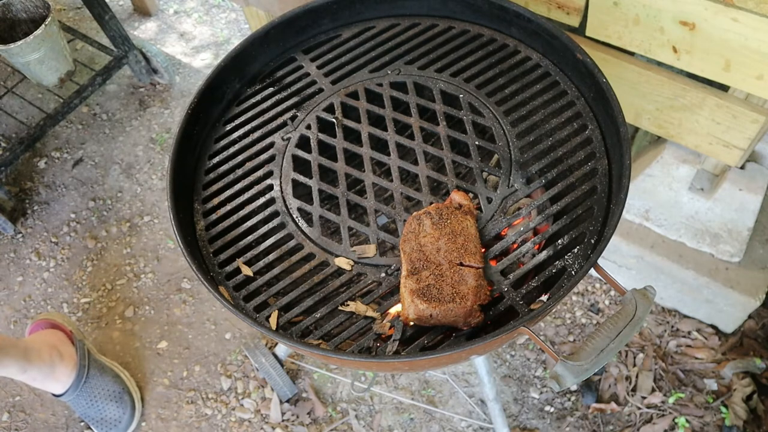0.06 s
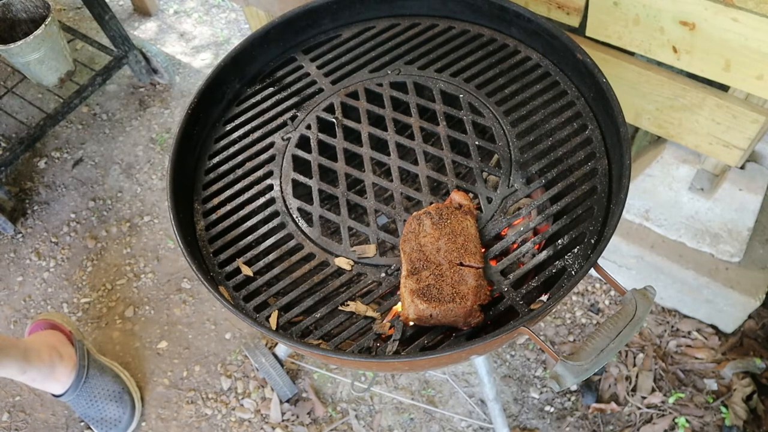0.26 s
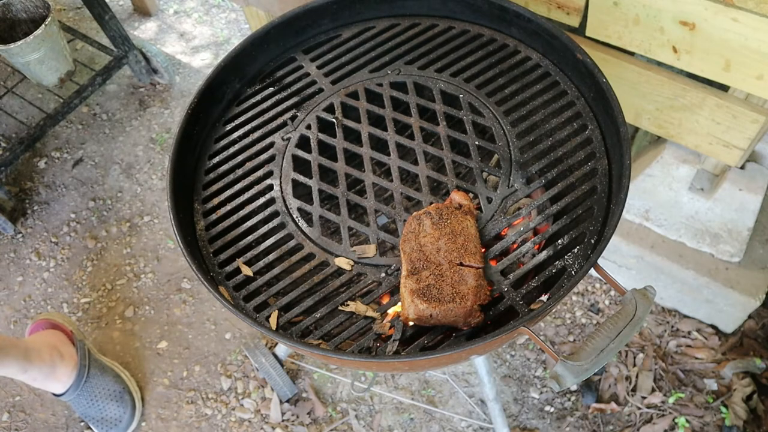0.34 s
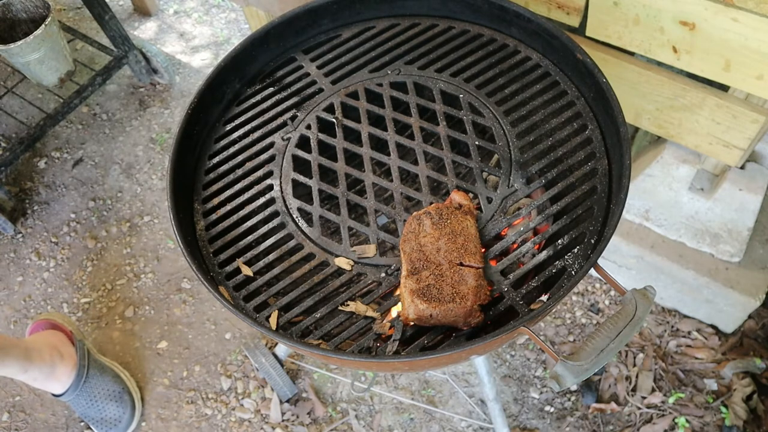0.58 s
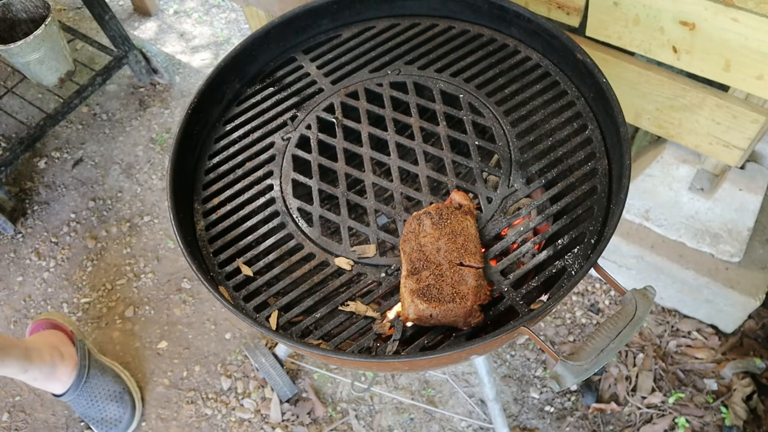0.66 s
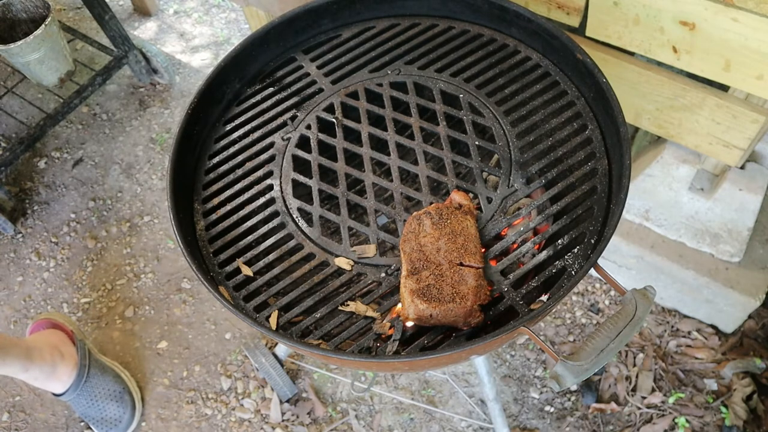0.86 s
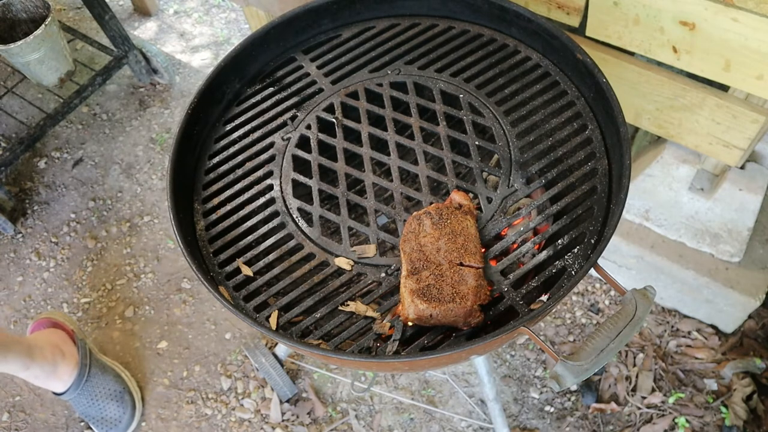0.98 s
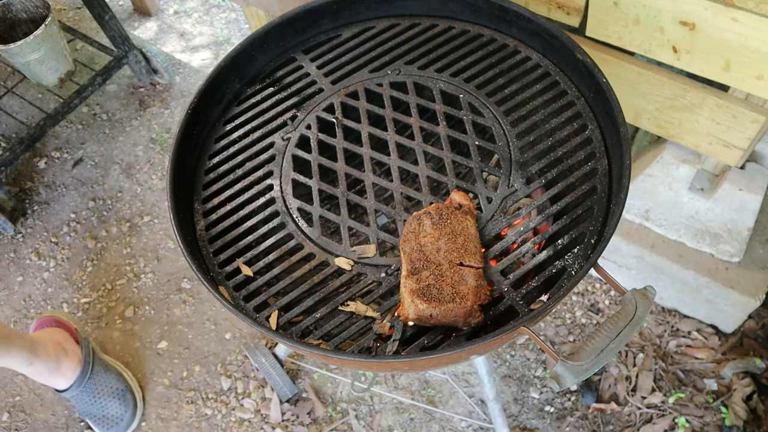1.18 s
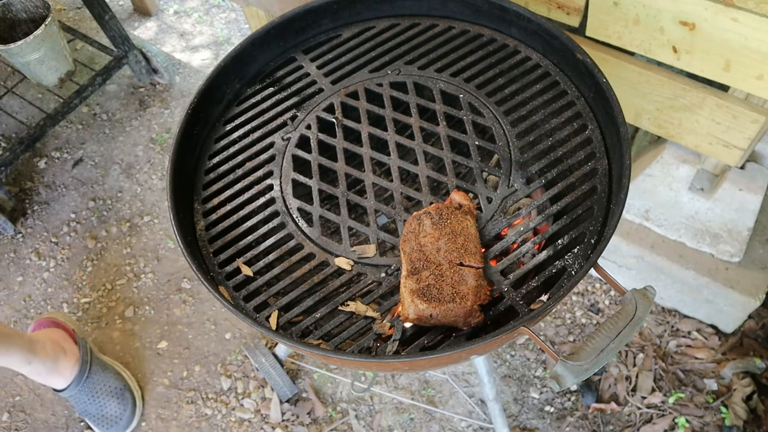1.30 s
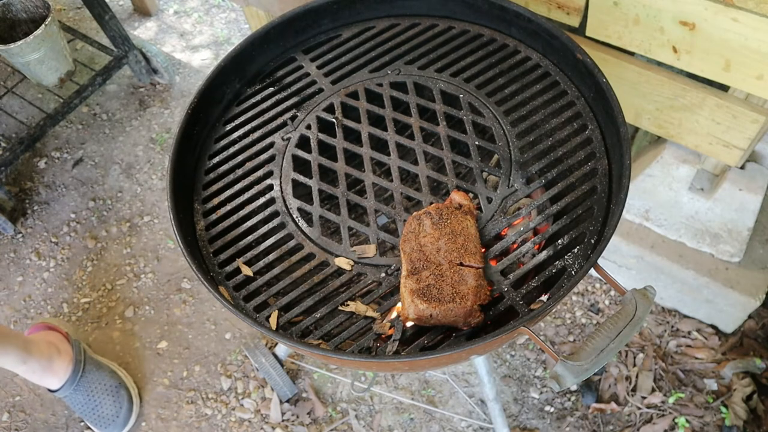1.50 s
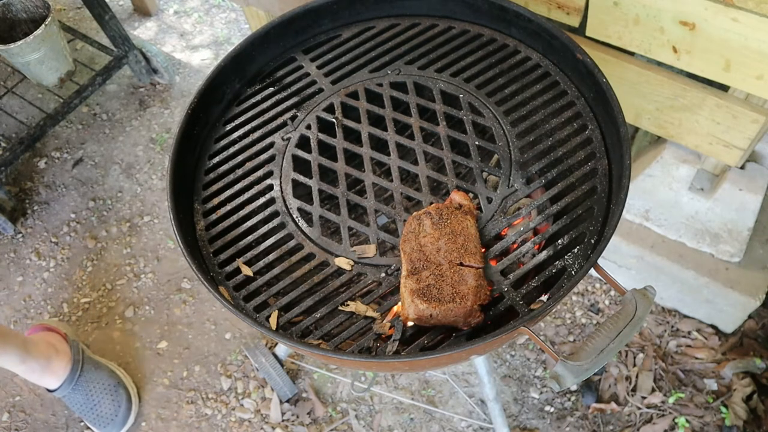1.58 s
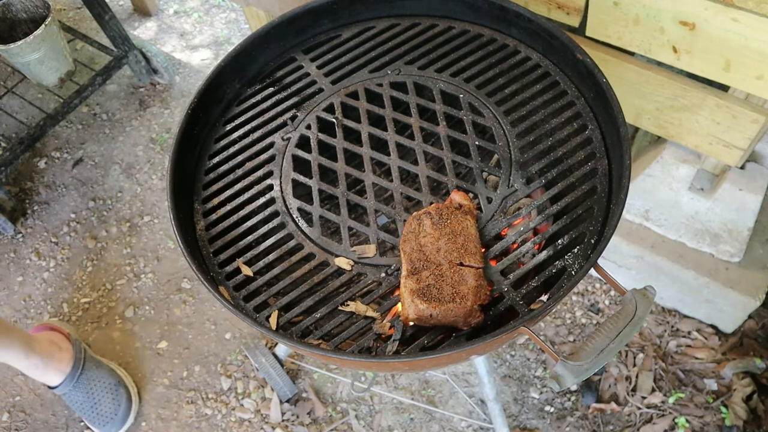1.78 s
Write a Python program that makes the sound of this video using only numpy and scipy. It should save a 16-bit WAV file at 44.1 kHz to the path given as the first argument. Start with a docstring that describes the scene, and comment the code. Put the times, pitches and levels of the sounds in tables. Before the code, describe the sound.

One short metallic knock on a grill over a steady sizzle of meat.

```python
"""Outdoors, just above an open kettle grill. Meat sizzles steadily over the coals: hiss and tiny bursts.
Under it lie a low rumble and a distant, slowly receding rush. One short metallic knock rings the grate
and the hollow bowl; a few soft, duller bumps follow. Drops of fat burst with small, sharp ticks."""
import sys
import numpy as np
from scipy import signal
from scipy.fft import rfft, irfft
from scipy.io import wavfile

SR = 44100
rng = np.random.default_rng(int(sys.argv[2]) if len(sys.argv) > 2 else 0)


def master_out(mix):
    """Clip the mix to full scale and print it as 16-bit PCM to the path in sys.argv[1]."""
    frames = np.transpose(np.atleast_2d(mix))
    ceiling = np.clip(frames, -1, 1)
    pcm = np.round(ceiling * 32767).astype(np.int16)
    wavfile.write(sys.argv[1], SR, pcm)


N = 81585
TOP_HZ = 15750


def undb(db):
    """Decibels to gain."""
    return 10 ** (np.asarray(db) / 20)


def unit(x):
    """Scale to rms 1."""
    return x / np.sqrt(np.mean(x ** 2))


def colour(x, spectrum):
    """Filter by (freq_hz, density_db) points; rms 1."""
    points_hz, density_db = np.array(spectrum, float).T
    freq_hz = np.maximum(np.fft.rfftfreq(N, 1 / SR), 1)
    gain_db = np.interp(np.log(freq_hz), np.log(points_hz), density_db)
    return unit(irfft(rfft(x) * undb(gain_db), N))


def resonate(x, centre_hz, width_hz):
    """One steep, zero-phase resonance."""
    freq_hz = np.maximum(np.fft.rfftfreq(N, 1 / SR), 1)
    detuning = (freq_hz - centre_hz ** 2 / freq_hz) / width_hz
    return irfft(rfft(x) / (1 + detuning ** 2), N)


def band_noise(centre_hz, width_hz):
    """Noise in one resonance; rms 1."""
    return unit(resonate(rng.standard_normal(N), centre_hz, width_hz))


def since(start_s):
    """Seconds since start_s, zero before."""
    return np.maximum(np.arange(N) / SR - start_s, 0)


def fade(age_s, t60_s, rise_s=1 / SR):
    """Envelope: exponential build-up and decay."""
    return (1 - np.exp(-age_s / rise_s)) * np.exp(-np.log(1000) * age_s / t60_s)


def sizzle(level_db=-38.5, bursts_per_s=1500, spread_db=2.5, crackle_db=-10, flutter_rms_db=0.63):
    """Frying meat: hiss plus many tiny bursts; the level flutters slightly."""
    # freq_hz, density_db
    frying_spectrum = [(300, -12.5), (700, -20.5), (1020, -10), (1300, -12), (1700, -12), (2100, -10.5),
                       (2600, -9.5), (3100, -6.5), (3600, -7.5), (4100, -11), (4700, -7.5), (5250, -2.5),
                       (5600, -5.5), (6200, -12), (8500, -8.5), (12500, -10.5), (14000, -13.5),
                       (16000, -16)]
    onsets = rng.random(N) < bursts_per_s / SR
    size_db = spread_db * np.minimum(rng.exponential(size=N), 5)
    hiss = rng.standard_normal(N)
    bursts = onsets * undb(size_db) * rng.choice([-1, 1], N)
    frying = colour(hiss + undb(crackle_db) * unit(bursts), frying_spectrum)
    flutter_db = flutter_rms_db * band_noise(centre_hz=10.4, width_hz=20.8)
    return undb(level_db + flutter_db) * frying


def rumble():
    """Low outdoor noise, swelling gently."""
    # freq_hz, density_db
    rumble_spectrum = [(15, -23), (28, -12), (60, -5), (115, -2), (142, -6.5), (175, 2), (230, -9),
                       (290, -6.5), (350, -15), (520, -19.5), (900, -35), (2000, -26)]
    # time_s, level_db
    swells = [(0, -52), (.2, -52.5), (.27, -48), (.36, -53.5), (.72, -50.5), (.97, -51.5), (1.3, -50.5),
              (1.52, -50.5), (1.85, -51.5)]
    level_db = np.interp(since(0), *np.array(swells).T)
    return undb(level_db) * colour(rng.standard_normal(N), rumble_spectrum)


def distant_rush(start_db=-47, fall_db_per_s=3):
    """Far-off noise, perhaps traffic, slowly receding."""
    # freq_hz, density_db
    rush_spectrum = [(200, -12), (400, -9), (700, -5), (1000, 1), (1400, -7.5), (2500, -12.5), (5000, -41)]
    level_db = start_db - fall_db_per_s * since(0)
    return undb(level_db) * colour(rng.standard_normal(N), rush_spectrum)


def ring(age_s, modes, t60_scale):
    """Struck modes build up and decay, sooner when the contact damps them."""
    return sum(undb(level_db) * np.sin(2 * np.pi * pitch_hz * age_s)
               * fade(age_s, t60_s * t60_scale, rise_ms / 1000)
               for pitch_hz, level_db, t60_s, rise_ms in modes)


def blow(start_s, metal_db, cutoff_hz, t60_scale, bowl_db):
    """One contact rings the grill's metal and hollow bowl; a soft contact is duller."""
    # freq_hz, density_db: bright crack of first touch
    crack_spectrum = [(300, -47), (1000, -7), (2400, 1), (3400, 0), (4200, -4), (5200, 5), (6400, -15),
                      (7200, -7), (11000, -49)]
    # freq_hz, density_db: dense ringing of thin sheet metal
    clang_spectrum = [(280, -40), (430, -18), (520, -14.5), (850, 4.5), (1150, -10.5), (1600, 1.5),
                      (1850, -5.5), (2400, -4), (3050, 7), (3780, 1.5), (3980, -16.5), (4650, -12),
                      (5100, 2.5), (5500, -7), (6400, -8.5), (7000, -28), (11000, -42)]
    # pitch_hz, level_db, t60_s, rise_ms
    grill_modes = [(704, -18, 0.28, 7.3), (785, -12, 0.27, 9.3), (836, -13.5, 0.36, 7.1),
                   (880, 4, 0.088, 3.8), (963, -13.5, 0.083, 1.2), (1145, -22.5, 0.27, 3),
                   (1217, -17.5, 0.175, 3), (1522.5, -11, 0.27, 7.6), (1557, 0.5, 0.14, 15),
                   (1616, -16.5, 0.13, 4.5), (2670, -19, 0.16, 1), (2840, -8.5, 0.1, 1),
                   (3100, -8.5, 0.15, 2.7), (3118, -4, 0.2, 3), (3437, -16, 0.3, 0.57),
                   (3637, -9.5, 0.22, 0.42), (3690, -18.5, 0.34, .5), (4940, -23, 0.13, .5),
                   (5075, -11.5, 0.24, .5), (5228, -13.5, 0.16, .5)]
    # pitch_hz, level_db, t60_s, rise_ms: hollow resonances, slow to build
    bowl_modes = [(182, -18, .2, 18), (442, -3.5, .13, 14.5), (530, 2, 0.12, 22.5)]
    rise_s, seating_lag_s = 0.0011, 0.0032
    age_s = since(start_s)
    clang = colour(rng.standard_normal(N), clang_spectrum)
    clang *= fade(age_s, t60_s=0.26 * t60_scale, rise_s=rise_s)
    crack = colour(rng.standard_normal(N), crack_spectrum) * fade(age_s, t60_s=0.062)
    thud = band_noise(centre_hz=885, width_hz=190)  # the blow seats just after first touch
    thud *= fade(since(start_s + seating_lag_s), t60_s=0.028, rise_s=rise_s)
    tones = ring(age_s, grill_modes, t60_scale)
    metal = undb(-16) * tones + undb(-21) * (clang + crack) + undb(-18) * thud
    contact_lowpass = signal.butter(2, cutoff_hz, fs=SR, output="sos")
    bowl = ring(age_s, bowl_modes, t60_scale)
    return undb(metal_db) * signal.sosfilt(contact_lowpass, metal) + undb(bowl_db) * bowl


def spit(start_s, level_db, centre_hz, width_hz):
    """A drop of fat bursts: sharp tick, faint splatter."""
    tick = resonate(signal.unit_impulse(N, int(start_s * SR)), centre_hz, width_hz)
    splatter = band_noise(centre_hz, width_hz) * fade(since(start_s), t60_s=0.045)
    return undb(level_db) * (tick / tick.max() + undb(-21.5) * splatter)


def scene():
    """Blows and spits over sizzle and outdoor noise; both channels alike."""
    # start_s, metal_db, cutoff_hz, t60_scale, bowl_db
    grill_blows = [(.2133, 2, 11900, 0.95, -28.5), (.579, -9.5, 850, .45, -58), (.593, -21, 910, 0.42, -52),
                   (1.073, -23, 1090, 1, -44), (1.087, -16, 1200, 0.76, -34.5),
                   (1.098, -23, 2800, .45, -37)]
    # start_s, level_db, centre_hz, width_hz
    fat_spits = [(0.3418, -14.5, 11500, 6040), (0.343, -22, 8800, 8000), (.3633, -28, 5130, 700),
                 (.8423, -22, 2200, 3000), (.8442, -16.5, 5650, 2200), (0.8487, -28, 5400, 1300),
                 (.949, -43, 5130, 8000), (1.6475, -20, 6500, 11000)]
    mono = sizzle() + rumble() + distant_rush()
    mono += sum(blow(*row) for row in grill_blows)
    mono += sum(spit(*row) for row in fat_spits)
    return np.array([mono, mono])


def record(dry):
    """Steep low-pass at TOP_HZ."""
    return signal.sosfilt(signal.ellip(12, .1, 80, TOP_HZ, fs=SR, output="sos"), dry)


dry = scene()
out = record(dry)
master_out(out)
```